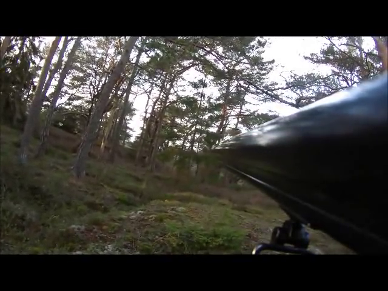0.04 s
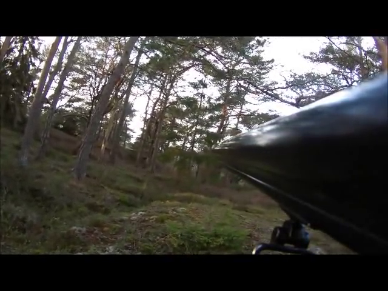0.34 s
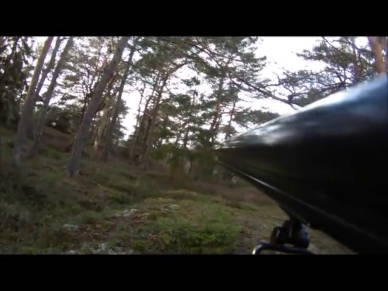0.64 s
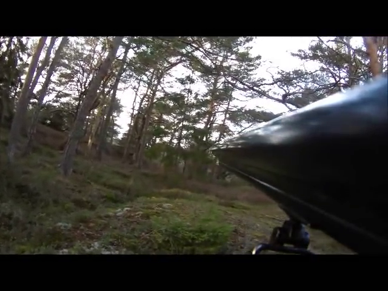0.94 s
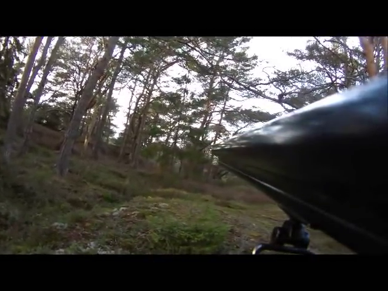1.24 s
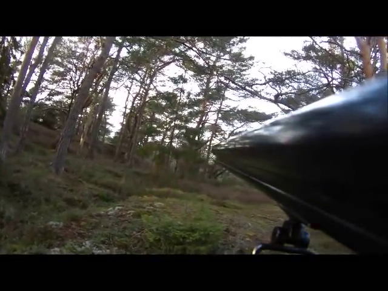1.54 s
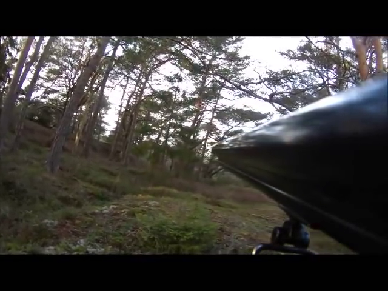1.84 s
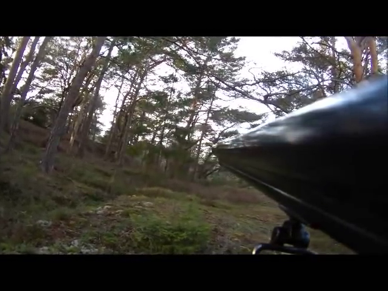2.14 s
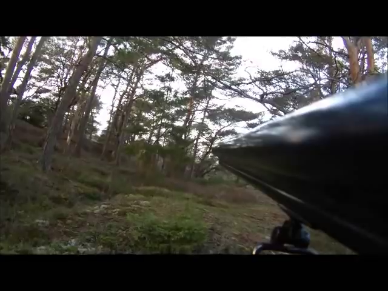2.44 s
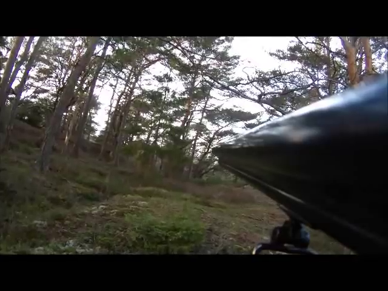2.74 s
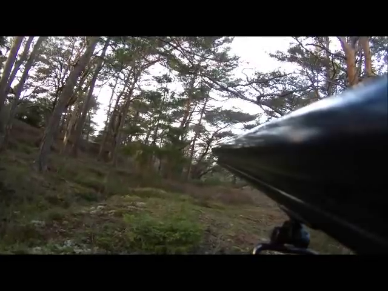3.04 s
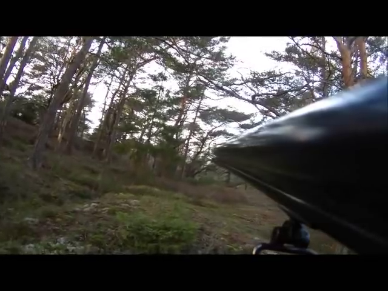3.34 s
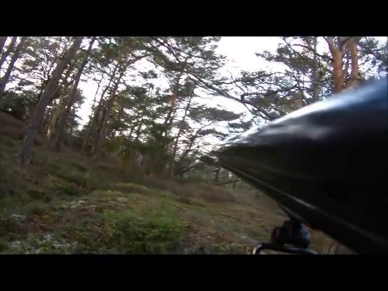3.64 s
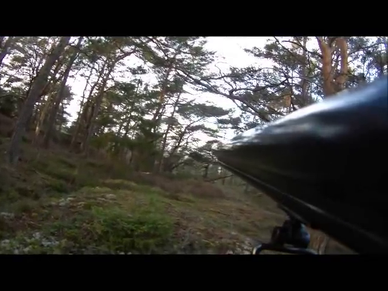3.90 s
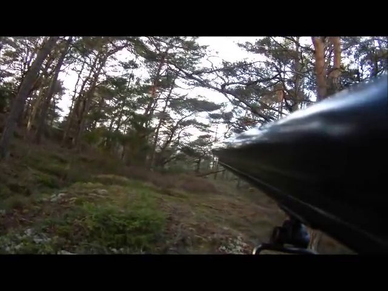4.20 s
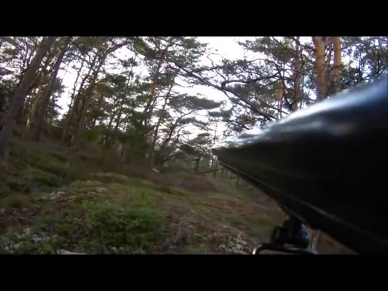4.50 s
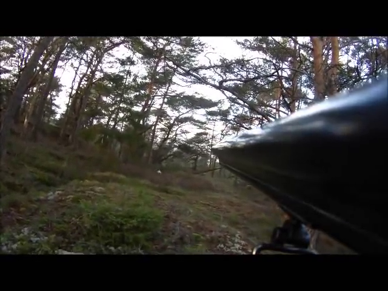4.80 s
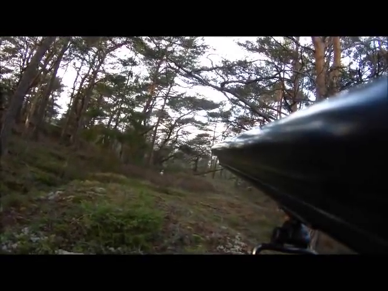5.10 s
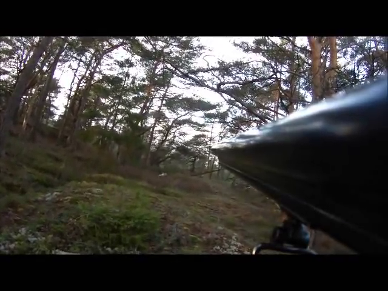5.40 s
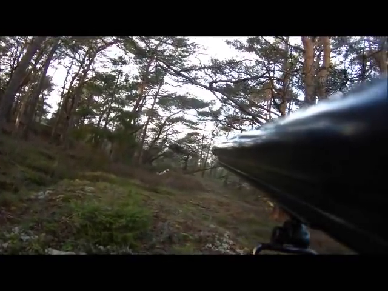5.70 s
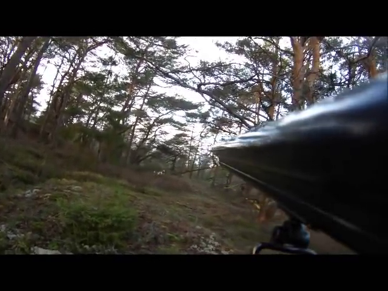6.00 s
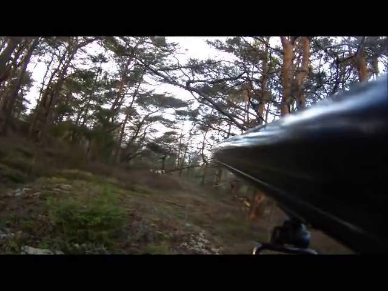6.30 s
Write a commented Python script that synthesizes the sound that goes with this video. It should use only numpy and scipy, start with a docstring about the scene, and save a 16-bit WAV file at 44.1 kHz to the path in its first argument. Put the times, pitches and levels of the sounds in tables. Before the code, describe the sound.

A hunting hound yelps in a forest, turning to hoarse barks as it comes nearer, with faint rustling and snapping undergrowth.

```python
"""Over a faint wash of air, a yelp's echo fades in a pine forest; then a hound on a scent calls again.
Its clear, falling yelps give way to hoarse barks as it comes nearer. Vibrating vocal folds make the
voice, and the closing mouth dulls each call. In the barks, strong and weak vibrations alternate (period
doubling), adding a tone at half the pitch; in some, a second tone joins in.
Tree trunks scatter every call, and dry undergrowth rustles and snaps."""
import sys
import numpy as np
from scipy import signal
from scipy.fft import rfft, irfft, next_fast_len
from scipy.io import wavfile

SR = 44100
rng = np.random.default_rng(int(sys.argv[2]) if len(sys.argv) > 2 else 0)


def put_to_file(sound):
    """Save the sound as 16-bit audio at rate SR, in the file named by the first command-line argument."""
    columns = np.atleast_2d(sound).T  # one column per channel
    safe = np.clip(columns, -1, 1)
    whole_steps = np.round(safe * 32767)
    wavfile.write(sys.argv[1], SR, whole_steps.astype(np.int16))


N = 288855
T = np.arange(N) / SR

# Levels in the tables are relative: the functions turn them up or down further.
# Tone colour of air in the trees, with a faint hiss: frequency_hz, level_db
AIR_COLOUR = [(12, -57.5), (20, -22), (118, -14.5), (169, -6), (217, -4.5), (278, -2.5), (367, -3),
              (398, 2), (587, 2), (674, 0.5), (1210, -3.5), (1780, -14.5), (2930, -19), (4200, -23),
              (15000, -29)]
# Ring of an earlier yelp among the trees: pitch_hz, width_hz, level_db
FADING_RINGS = [(577.8, 66.5, -46.5), (1004.4, 46, -58), (1745, 230, -61.5)]
# Tone colour of dry undergrowth: frequency_hz, level_db
LEAF_COLOUR = [(1000, -31.5), (2000, 1), (3200, 2), (5500, -1.5), (7500, -9), (10000, -17), (15000, -45.5)]
# The hound pushes through undergrowth: middle_s, half_length_s, level_db
BRUSH_PUSHES = [(3.913, 0.11, -72.5), (5.009, 0.065, -70.5), (5.635, 0.104, -71.5), (6.008, 0.243, -67)]
# Short dry crackles (twigs snapping, and a brief hiss as a bark ends): time_s, level_db
DRY_CRACKLES = [(3.754, -50.5), (3.892, -51.5), (4.787, -52), (4.966, -66.5), (5.5252, -58),
                (5.5866, -45.5), (5.644, -50), (5.931, -50.5), (6.028, -56), (6.4494, -61.5)]
# How well throat and mouth pass each frequency (peaks are resonances): frequency_hz, level_db
THROAT_COLOUR = [(300, -40.5), (410, -13.5), (600, 5), (800, 1.5), (1000, -1.5), (1250, -3), (1550, -10),
                 (1980, -14), (2250, -22), (3100, -35), (3900, -33), (4900, -24.5), (5700, -28),
                 (8500, -50.5)]
# Second tones of the vocal folds in barks: start_s, length_s, pitch_hz, level_db
FOLD_TONES = [(3.166, 0.0384, 657.3, -27.5), (3.228, 0.04, 657.5, -39.5), (4.293, 0.049, 517, -31),
              (4.715, 0.047, 522.6, -29.5)]
# Clear yelps, each one arch of pitch: start_s, length_s, crest_s, width_s, crest_hz, sink_hz, level_db,
# swell_s, half_shut_s, second_db, upper_db, edge_db, rasp_db (four boosts, see throat), echo_db
CLEAR_YELPS = [ (0.255, 0.195, 0.028, 0.052, 687.3, 437.3, -35, 0.0406, 0.138, 3.5, 5.5, -12, -7.5, 8.5),
               (0.693, 0.148, 0.022, 0.07625, 665.4, 361.4, -32, 0.0258, 0.1031, 4, 7.5, -3, -8, 7),
               (1.503, 0.1826, 0.00198, 0.02792, 710.1, 518.9, -28, 0.0251, 0.114, -3.5, 1, -22, -11, 4),
               (1.892, 0.162, 0.042, 0.078, 650.1, 354.5, -28, 0.0184, 0.106, 3.5, 6, 3.5, -4, 2),
               (2.304, 0.15, 0.026, 0.115, 623.2, 303.1, -27, 0.0221, 0.1003, -2.5, 6.5, -2, -2.5, 2),
               (2.692, 0.148, 0.05, 0.086, 625.9, 290.3, -27.5, 0.0262, 0.1388, 1, 4, -1, -3.5, 4), ]
# Hoarse barks: start_s, length_s, break_s, clear_hz, hoarse_hz, final_hz, level_db, swell_s,
# tire_db_per_s, rough_before, rough_after, half_pitch_share (these three 0-1),
# second_db, upper_db, muffle_db, edge_db, rasp_db, echo_db
HOARSE_BARKS = [ (1.078, 0.1647, 0.0387, 642.9, 779.9, 840.3, -32, 0.0155, 13.5, 0.158, 0.443, 0.79, 2.98, 2.4, 13.2, 4, -5, 2),
                (3.116, 0.165, 0.062, 670.6, 814.9, 810, -25.5, 0.0151, 91, 0.111, 0.538, 0.854, 3.53, 10.84, 14.8, -0.5, -3, 4),
                (4.193, 0.165, 0.042, 791.7, 891.2, 902.8, -29, 0.0377, 5, 0.2, 0.387, 0.507, 1.42, 3.9, 11.2, -4.5, -7, 0.5),
                (4.653, 0.12, 0.028, 795.3, 905.9, 824, -23.5, 0.03065, 53.5, 0.412, 0.377, 0.538, 3.6, 2.27, 8.4, -1.5, 3.5, 3),
                (5.376, 0.168, 0.047, 740.2, 791.2, 684.6, -20, 0.02023, 77.5, 0.361, 0.198, 0.731, 4.88, 13.65, 25.7, 9.5, -5.5, -1),
                ]

SWELL_DB = 20  # each call swells from this far down
PRESSED_DB, PRESSED_S = 2.5, 0.0152  # calls start pressed, with briefly stronger overtones


def undb(db):
    """Turn decibels into a factor to multiply by."""
    return 10 ** (np.asarray(db) / 20)


def unit(x):
    """Scale a signal to an average strength (rms) of 1."""
    return x / np.sqrt(np.mean(np.abs(x) ** 2))


def spectrum_db(hz, points):
    """Read the level at any frequency from a tone colour table."""
    points_hz, db = np.transpose(points)
    return np.interp(np.log(np.maximum(hz, 1)), np.log(points_hz), db)


def colour(x, points):
    """Give a noise the tone colour of a table, at strength 1."""
    gain = undb(spectrum_db(np.fft.rfftfreq(len(x), 1 / SR), points))
    return unit(irfft(rfft(x) * gain, len(x)))


def lowpass(x, hz, order):
    """Dull a sound above hz."""
    return signal.sosfilt(signal.butter(order, hz, fs=SR, output="sos"), x)


def flutter(n, hz):
    """A random wobble, up to about hz fast, as n complex numbers."""
    size = next_fast_len(n)
    white = rng.standard_normal((size, 2)) @ np.array([1, 1j])
    rolloff = np.sqrt(1 + (np.fft.fftfreq(size, 1 / SR) / hz) ** 4)
    return unit(np.fft.ifft(white / rolloff))[:n]


def noise_band(t, hz, spread_hz):
    """Noise reaching about spread_hz to either side of hz."""
    return unit(np.real(flutter(len(t), spread_hz) * np.exp(2j * np.pi * hz * t)))


def echo_shape(t, build_s, fade_s):
    """Echoes build up, and die away by 60 dB every fade_s."""
    return np.minimum(t / build_s, 1) * np.exp(-np.log(1000) * t / fade_s)


def place(sounds):
    """Lay (start_s, sound) pairs on the time line."""
    out = np.zeros(N)
    for start_s, sound in sounds:
        i = max(int(start_s * SR), 0)
        out[i:i + len(sound)] += sound[:N - i]
    return out


def air(level_db=-53.72):
    """Air makes a soft, even wash in the treetops."""
    return colour(rng.standard_normal(N), AIR_COLOUR) * undb(level_db)


def lingering_yelp(fall_db_per_s=55):
    """The wood still rings with an earlier yelp."""
    ring = sum(undb(db) * noise_band(T, hz, width_hz / 2) for hz, width_hz, db in FADING_RINGS)
    return ring * undb(-fall_db_per_s * T)


def undergrowth(cracks_per_s=9000, burst_s=0.0137):
    """Dry stems make tiny cracks that swell with each push; bursts of this noise make short crackles."""
    sizes = undb(2 * np.minimum(rng.exponential(size=N), 5))
    cracks = colour(rng.standard_normal(N) * sizes * (rng.random(N) < cracks_per_s / SR), LEAF_COLOUR)
    burst = np.exp(-T[:SR // 8] / burst_s)
    bursts = place((time_s - .002, undb(db - 9) * burst) for time_s, db in DRY_CRACKLES)
    rustle = undb(-78 + 1.19 * T)  # grows as the hound nears
    pushes = sum(undb(db - 1) * np.exp(-((T - middle_s) / half_s) ** 2)
                 for middle_s, half_s, db in BRUSH_PUSHES)
    return cracks * (rustle + pushes + bursts)


def deep_wood(sound):
    """The deeper wood sends back a long, dull echo."""
    t = T[:3 * SR // 2]
    tail = unit(rng.standard_normal(len(t)) * echo_shape(t, build_s=0.0572, fade_s=0.918))
    response = undb(-13) * lowpass(tail, hz=2000, order=4) / np.sqrt(len(t))
    return signal.fftconvolve(sound, response)[:N]


def trunks(start_s, sound, echo_db=0, echoes_per_s=900):
    """Nearby trunks add a spray of echoes, a new one for each sound."""
    t = T[:SR // 2]
    hits = rng.standard_normal(len(t)) * (rng.random(len(t)) < echoes_per_s / SR)
    spray = lowpass(unit(hits * echo_shape(t, build_s=0.0147, fade_s=0.3735)), hz=4200, order=1)
    response = undb(echo_db - 6) * spray / np.sqrt(len(t))
    response[0] += 1  # the straight path to the listener
    return start_s, signal.fftconvolve(sound, response)


def jaw_hiss(call_end_s, level_db, lead_s=0.023, length_s=0.08):
    """The last air of a call rushes past the teeth."""
    t = T[:int(length_s * SR)]
    hiss = noise_band(t, hz=3304, spread_hz=600)
    return call_end_s - lead_s, undb(level_db) * signal.windows.hann(len(t)) * hiss


def second_tone(start_s, length_s, pitch_hz, level_db, waver=0.0545):
    """One vocal fold briefly swings at a pitch of its own."""
    n = int(length_s * SR)
    phase = 2 * np.pi * np.cumsum(pitch_hz * (1 + waver * flutter(n, hz=54).real)) / SR
    return start_s, np.sqrt(2) * undb(level_db) * signal.windows.tukey(n, .7) * np.sin(phase)


def throat(hz, second_db, upper_db, edge_db, rasp_db):
    """The throat shapes the voice; a wider, tenser mouth lifts the second and upper resonances."""
    second = second_db * np.interp(hz, [850, 1100, 1350, 1700], [0, 1, 1, 0])
    upper = upper_db * np.interp(hz, [1350, 1700, 2100, 3600], [0, 1, 1, .3])
    shrill_edge = edge_db * np.interp(hz, [2000, 2450, 3100, 3500], [0, 1, 1, 0])
    rasp = rasp_db * np.interp(hz, [3100, 4500], [0, 1])
    db = spectrum_db(hz, THROAT_COLOUR) + second + upper + shrill_edge + rasp
    return undb(db) / np.sqrt(1 + (hz / 8500) ** 12)


def closing(t, half_shut_s):
    """The mouth starts wide open (0) and shuts (1)."""
    return 1 - 1 / (1 + (t / half_shut_s) ** 4)


def arch(t, crest_s, width_s, crest_hz, sink_hz):
    """Pitch follows the push of the lungs: up to a crest, then down towards sink_hz."""
    return sink_hz + (crest_hz - sink_hz) / (1 + ((t - crest_s) / width_s) ** 2)


def voice(t, hz, shut, db, second_db, upper_db, edge_db, rasp_db, half_pitch_share, rough,
          attack_s=0.01544, release_s=0.0235):
    """The vocal folds make a stack of tones, shaken by roughness and shaped by the throat."""
    n = len(t)
    release = np.minimum((t[-1] - t) / release_s, 1)
    hz = hz * (1 + (0.0043 + 0.0374 * rough) * unit(flutter(n, hz=110).real))  # fast jitter
    hz = hz * (1 + 0.00856 * unit(flutter(n, hz=25).real))  # the folds never hold quite still
    hz = hz * (1 - 0.0616 * (1 - release))  # pitch sags as the lungs give out
    db = db + 1.94 * unit(flutter(n, hz=20).real)  # the level shudders
    edge_db = edge_db - 10.5 * shut
    rasp_db = rasp_db - 7 * shut - 12.5 * np.exp(-t / PRESSED_S)  # rasp comes in as the airflow builds
    phase = 2 * np.pi * np.cumsum(hz) / SR
    tones = 0
    for k in range(1, 34):
        tone_hz = hz * k / 2
        strength = half_pitch_share if k % 2 else 1  # odd k needs alternating strong and weak swings
        smear = rough + 0.091 * np.clip(np.log(k / 2), 0, 2)  # swirling air blurs high tones more
        tone = np.real((strength + smear * flutter(n, hz=140)) * np.exp(1j * phase * k / 2))
        # the closing mouth pulls the high resonances down
        slide = 1 + 0.0665 * (shut - .5) * np.clip(tone_hz / 1640 - 1, 0, 1)
        tones = tones + throat(slide * tone_hz, second_db, upper_db, edge_db, rasp_db) * tone
    fade = np.minimum(t / attack_s, release)
    return np.sqrt(2) * tones * fade * undb(db - 2)


def yelp(start_s, length_s, crest_s, width_s, crest_hz, sink_hz, level_db, swell_s, half_shut_s,
         second_db, upper_db, edge_db, rasp_db, echo_db):
    """A clear call that arches over and falls while the mouth closes."""
    t = T[:int(length_s * SR)]
    shut = closing(t, half_shut_s)
    early_shut = closing(t, 0.567 * half_shut_s)  # the second resonance is muffled first
    pressed_db = PRESSED_DB * np.exp(-t / PRESSED_S)
    call = voice(t, arch(t, crest_s, width_s, crest_hz, sink_hz), shut,
                 db=level_db - SWELL_DB * np.exp(-t / swell_s),
                 second_db=second_db + pressed_db - 22 * early_shut,
                 upper_db=upper_db + pressed_db - 32.5 * shut,
                 edge_db=edge_db, rasp_db=rasp_db, half_pitch_share=0.0167, rough=0.0163)
    return [trunks(start_s, call, echo_db), trunks(*jaw_hiss(start_s + length_s, level_db - 44.5))]


def bark(start_s, length_s, break_s, clear_hz, hoarse_hz, final_hz, level_db, swell_s, tire_db_per_s,
         rough_before, rough_after, half_pitch_share, second_db, upper_db, muffle_db, edge_db, rasp_db,
         echo_db, jump_s=0.00282):
    """A call that starts like a yelp, then jumps up in pitch and breaks into hoarse period doubling."""
    t = T[:int(length_s * SR)]
    shut = closing(t, half_shut_s=0.38 * length_s)
    pressed_db = PRESSED_DB * np.exp(-t / PRESSED_S)
    broken = .5 + .5 * np.tanh((t - break_s) / jump_s)  # 0 before the voice breaks, 1 after
    clear = arch(t, crest_s=0.036, width_s=0.04, crest_hz=clear_hz, sink_hz=0.6 * clear_hz)
    hoarse = hoarse_hz + (final_hz - hoarse_hz) * (t / length_s) ** 4
    call = voice(t, clear + (hoarse - clear) * broken, shut,
                 db=level_db - SWELL_DB * np.exp(-t / swell_s) - tire_db_per_s * t,
                 second_db=second_db + pressed_db,
                 upper_db=upper_db + pressed_db - muffle_db * shut,
                 edge_db=edge_db, rasp_db=rasp_db, half_pitch_share=half_pitch_share * broken,
                 rough=rough_before + (rough_after - rough_before) * broken)
    hiss_db = level_db - tire_db_per_s * length_s / 2 - 31
    return [trunks(start_s, call, echo_db), trunks(*jaw_hiss(start_s + length_s, hiss_db))]


def scene(mouth_hz=290, approach_db_per_s=1.15):
    """The hound among the trees, the undergrowth and the air."""
    yelps = sum(place(yelp(*row)) for row in CLEAR_YELPS)
    barks = sum(place(bark(*row)) for row in HOARSE_BARKS)
    tones = place(trunks(*second_tone(*row)) for row in FOLD_TONES)
    bass_cut = signal.butter(4, mouth_hz, "high", fs=SR, output="sos")  # a small mouth gives no bass
    hound = signal.sosfilt(bass_cut, yelps + barks + tones)
    far_share = undb(approach_db_per_s * (T.mean() - T))  # less far echo as the hound nears
    return (hound + deep_wood(hound * far_share) + lingering_yelp() + undergrowth() + air())[None]


def record(dry, top_hz=15350):
    """Cut off the very highest treble."""
    return signal.sosfilt(signal.ellip(10, .2, 70, top_hz, fs=SR, output="sos"), dry)


dry = scene()
out = record(dry)
put_to_file(out)
```